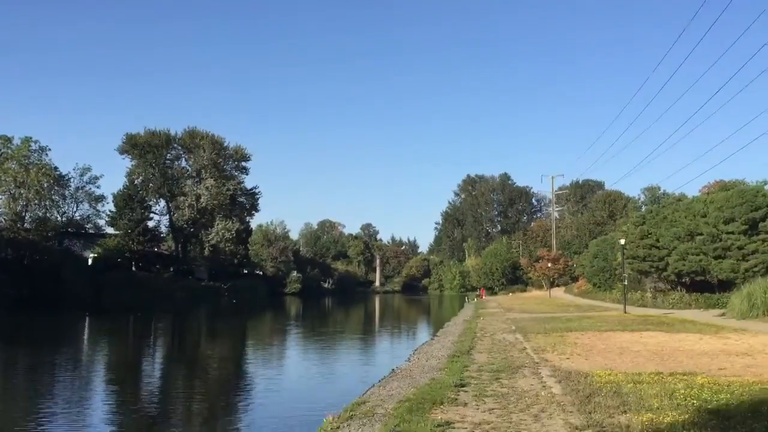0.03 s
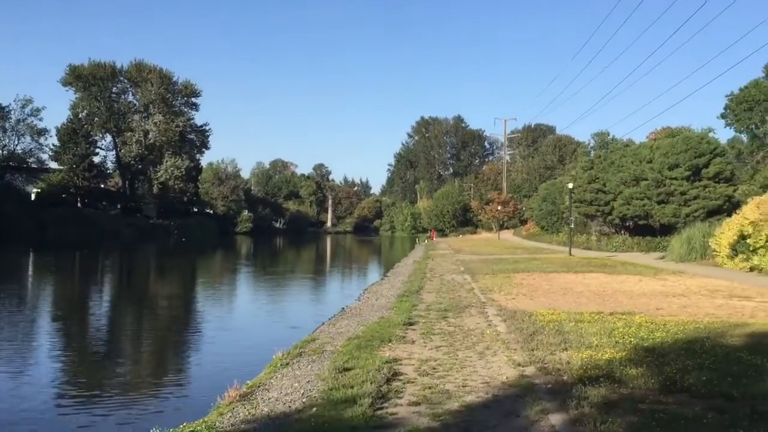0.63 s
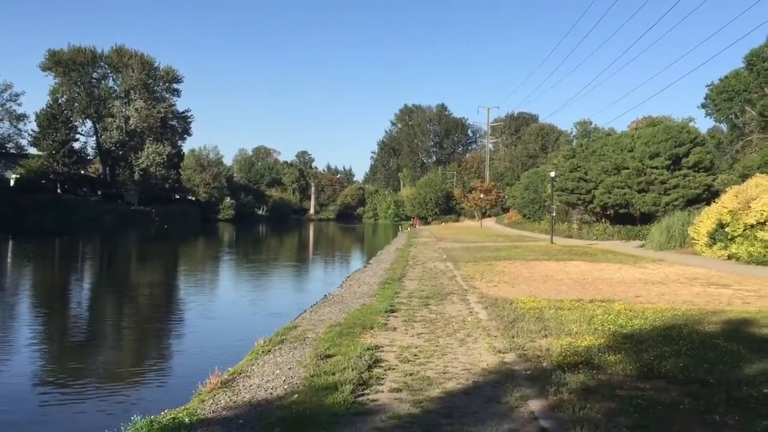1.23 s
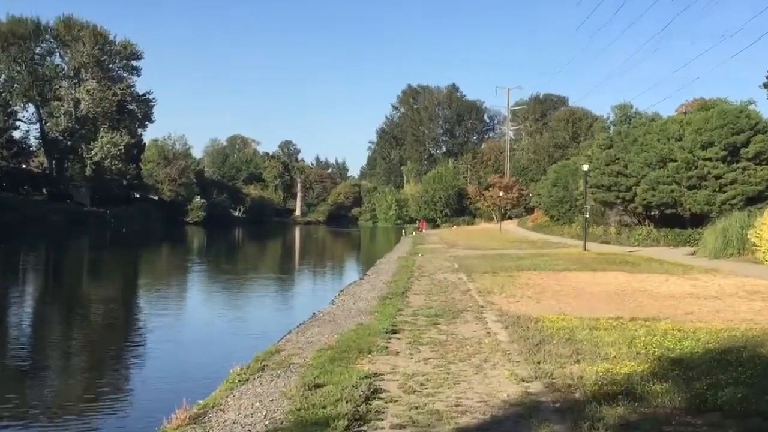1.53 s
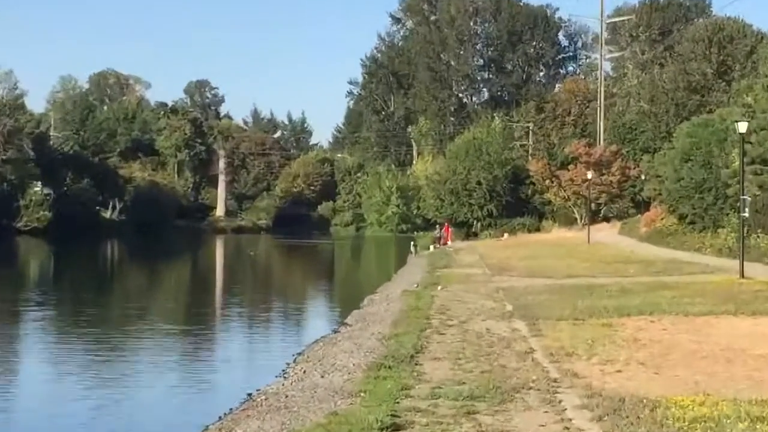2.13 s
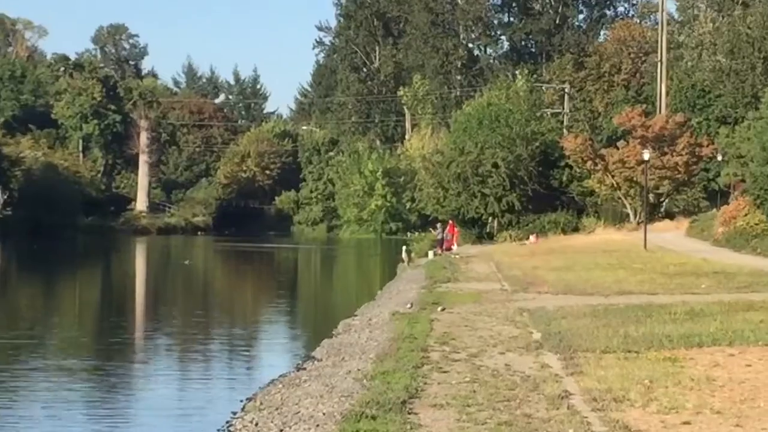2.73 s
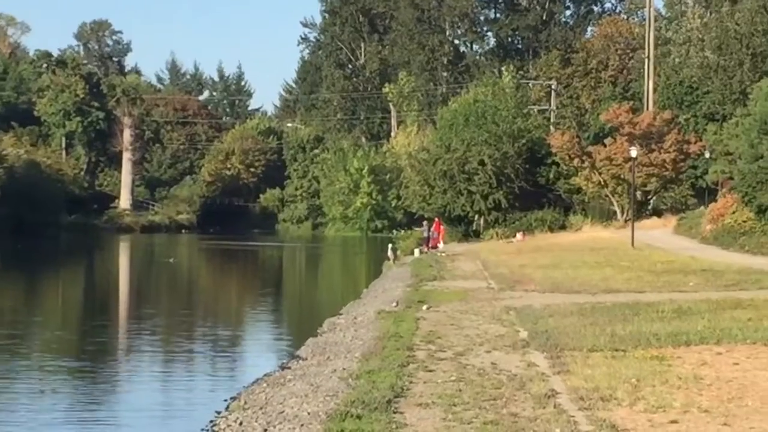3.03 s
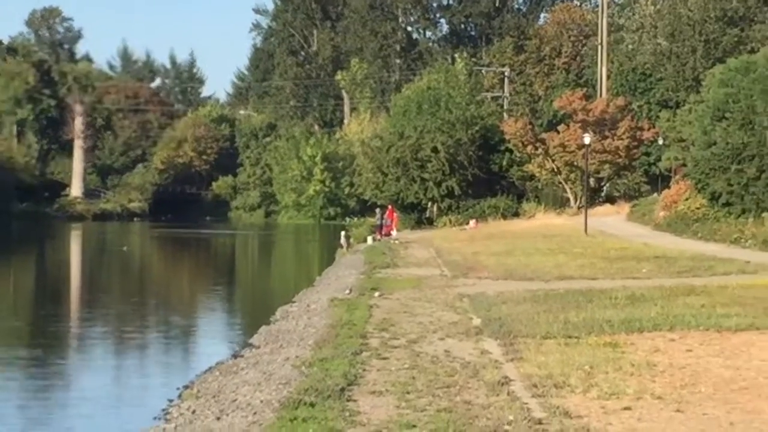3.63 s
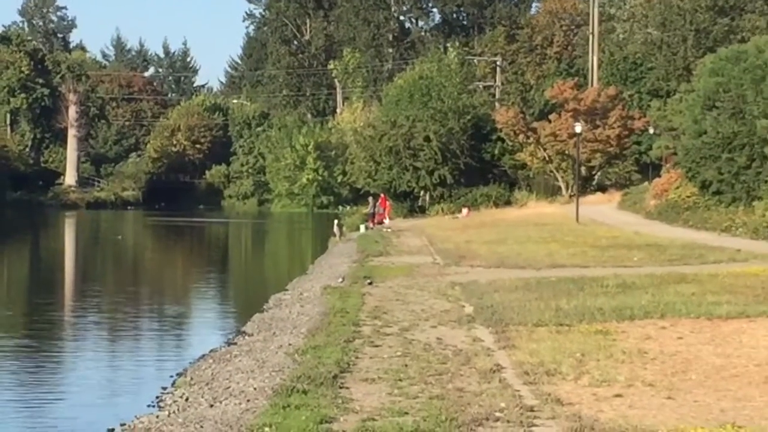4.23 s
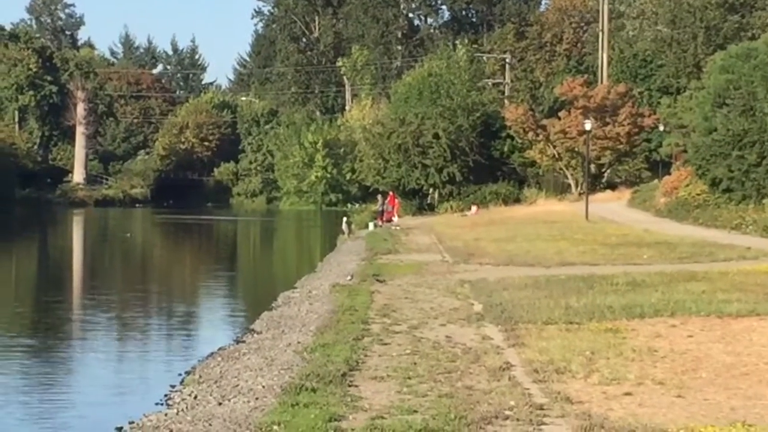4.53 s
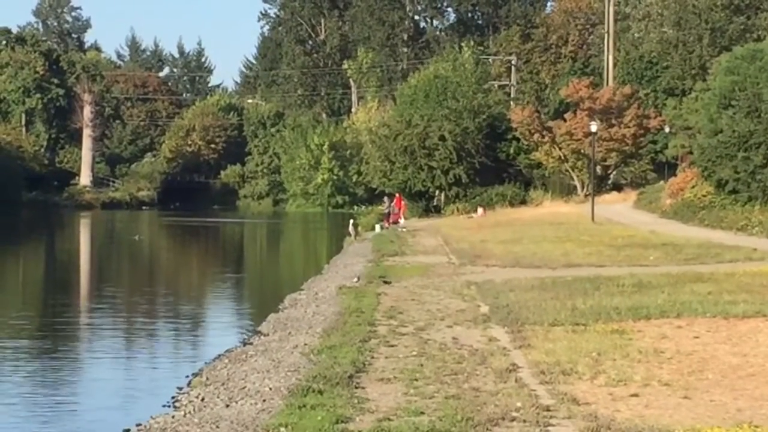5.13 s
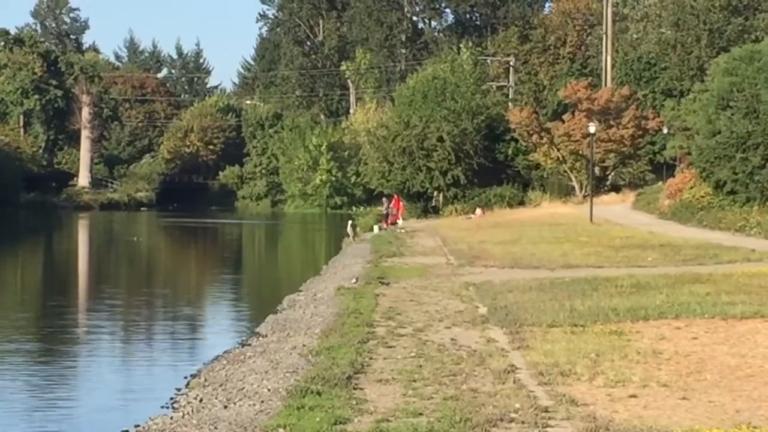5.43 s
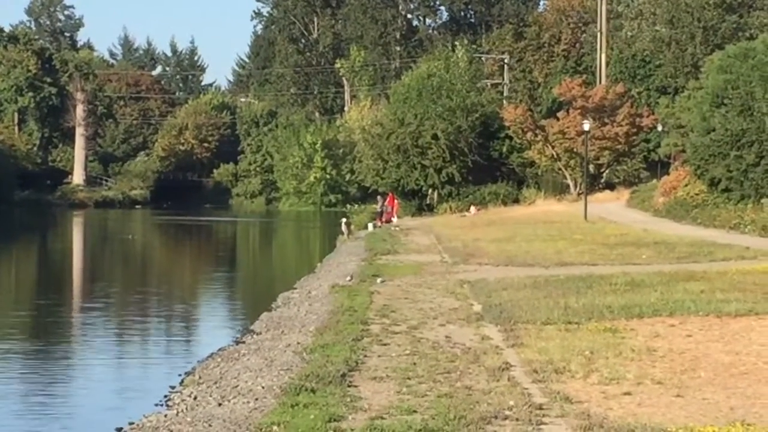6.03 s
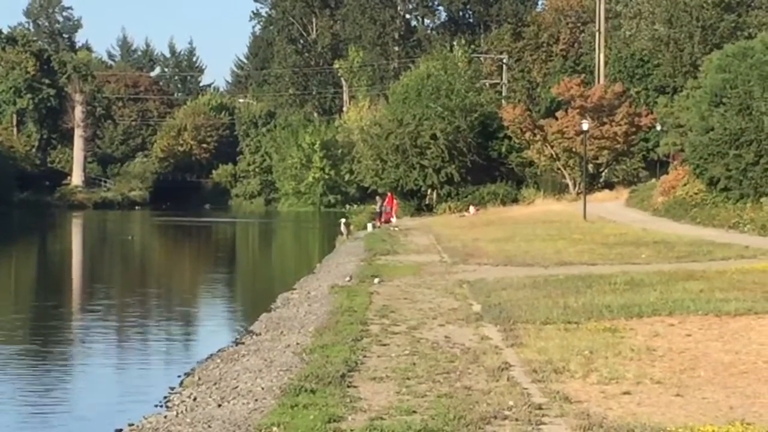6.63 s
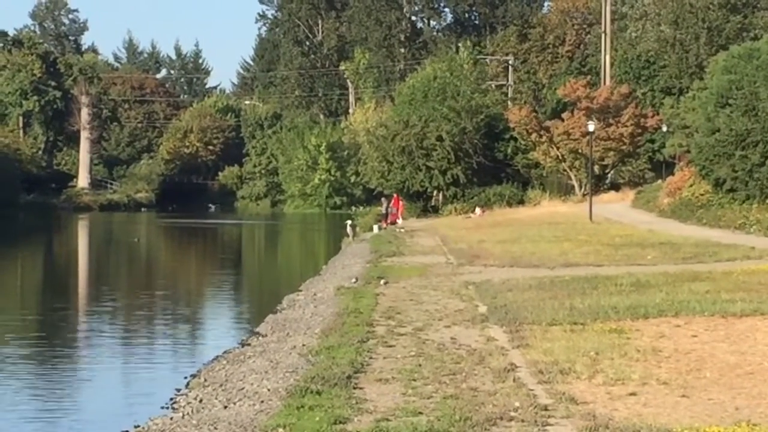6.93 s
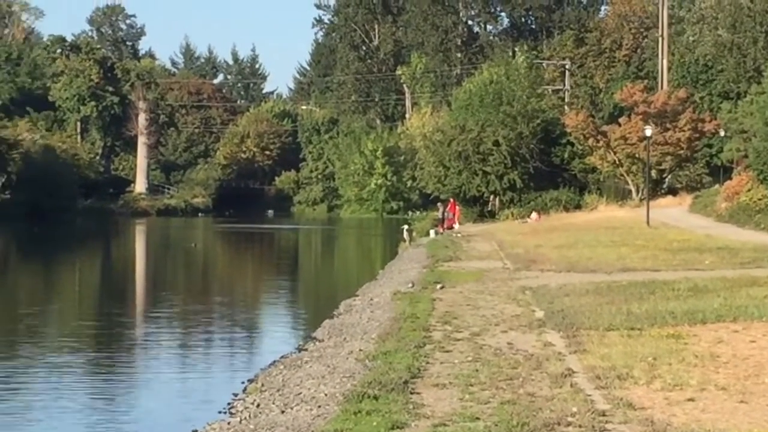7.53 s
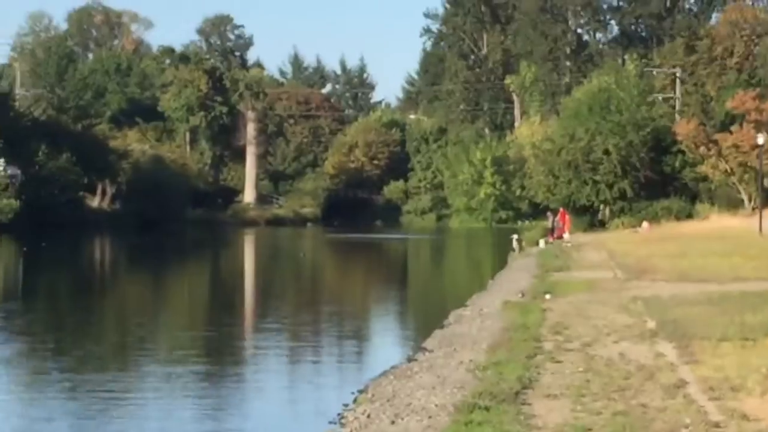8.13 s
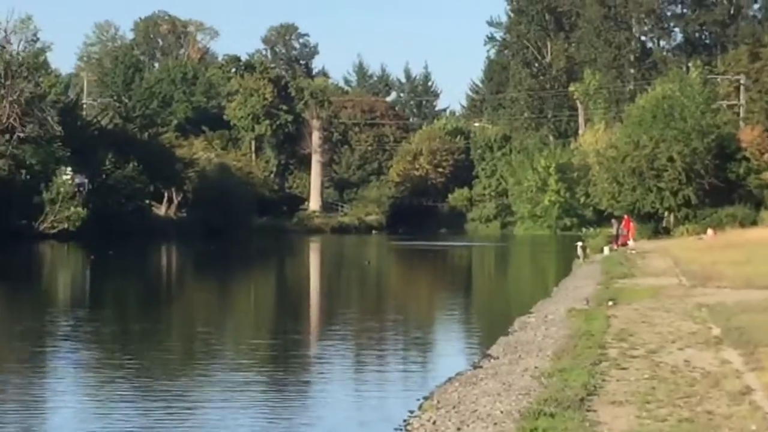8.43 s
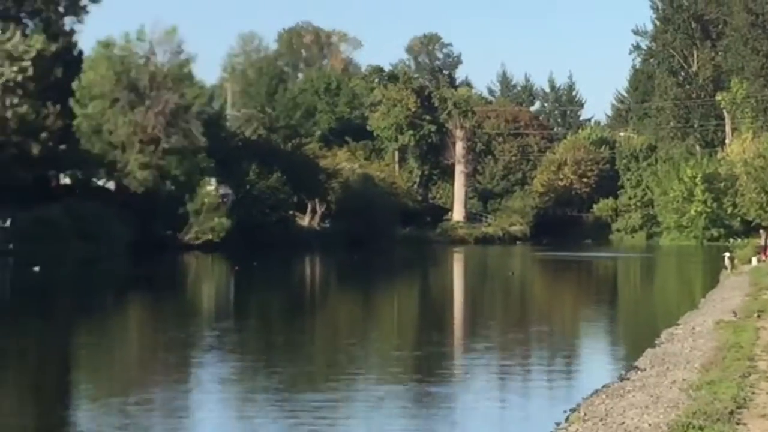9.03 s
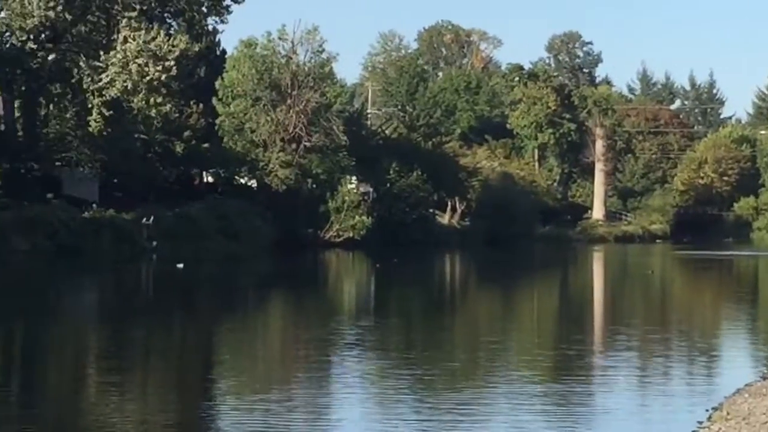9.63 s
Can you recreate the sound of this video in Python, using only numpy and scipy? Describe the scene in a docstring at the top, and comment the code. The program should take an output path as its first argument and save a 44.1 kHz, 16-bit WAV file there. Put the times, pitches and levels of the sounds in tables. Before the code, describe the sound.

Beside a calm river in a park, far road traffic rumbles, swelling and sinking as cars pass. Two engines drone at the start and fade. A distant gull then gives a loose series of short, hoarse yelps, thins out, and calls twice more near the end. Its calls echo lightly off the banks, quieter than the traffic. A faint flock and a soft hiss lie behind, all far from the microphone.

```python
"""A gull yelps and squawks in loose series across a calm river in a park, over a faint flock.
Each call is a stack of harmonics that climbs, sags and turns hoarse. The water smears the calls and
the trees on the banks throw them back. Short tones add one yelp's echo, a faint hoot and thin chirps.
Road traffic rumbles far off: the noise of cars swells and sinks as they pass,
and two engines drone at first. A faint, even hiss lies under everything."""
import sys
import numpy as np
from scipy import signal
from scipy.fft import rfft, irfft, next_fast_len
from scipy.io import wavfile

SR = 44100
rng = np.random.default_rng(int(sys.argv[2]) if len(sys.argv) > 2 else 0)


def materialize(psi):
    """Save the field psi as 16-bit PCM at rate SR to the path in sys.argv[1].

    A 1-D psi becomes a single channel; in a 2-D psi each row is a channel.
    """
    bounded = np.clip(np.atleast_2d(psi).T, -1, 1)
    quanta = np.round(bounded * 32767).astype(np.int16)
    wavfile.write(sys.argv[1], SR, quanta)


N = 430857
T = np.arange(N) / SR

# The tone colours of the noises. Each row: frequency in Hz, relative level in dB.
HISS_COLOUR = [(1000, 5.5), (3000, 2), (4300, 4), (4900, 0.5), (5500, 3), (7000, 1.5), (7700, -0.5),
               (9500, 0.5), (10400, -4.5), (11500, -1.5), (15000, -4.5)]
RUMBLE_COLOUR = [(12, -40), (28, -30), (40, -13.5), (60, -6), (85, 2), (125, -3.5), (195, -6), (270, -10),
                 (330, -14), (420, -25), (700, -57), (3000, -100)]
BOOM_COLOUR = [(60, -40), (125, -18), (160, 5), (200, 0.5), (330, -10), (450, -44), (1500, -90)]
SLOW_TYRE_COLOUR = [(60, -52), (250, -9.5), (420, -8.5), (600, -1), (850, -0.5), (1100, -7), (1400, -19),
                    (1800, -23), (2500, -29.5), (4000, -43), (12000, -80.5)]
MEDIUM_TYRE_COLOUR = [(200, -51), (600, -20), (820, -2.5), (1000, 2.5), (1150, -3.5), (1430, -17),
                      (1700, -16.5), (2100, -25), (2700, -38), (4000, -43.5), (12000, -76)]
FAST_TYRE_COLOUR = [(300, -62), (900, -2), (1250, 4), (1550, -5), (1900, -16.5), (2600, -29), (4000, -42.5),
                    (12000, -86.5)]
EXHAUST_COLOUR = [(100, -31), (250, -4.5), (480, 1), (650, -10.5), (1500, -26), (8000, -85)]
# Cars passing gaps in the trees. Each row: loudest moment, rise time and fall time in seconds,
# tyre level in dB, speed from 0 to 1, rumble level in dB.
PASSING_CARS = [(.1, .3, 0.24, -49.5, 0.51, -53), (.7, 0.29, 0.51, -51, 0.56, -44),
                (1.7, 0.3, 0.27, -58.5, 0.6, -55), (2.6, 0.34, 0.81, -55.5, 0.23, -53.5),
                (4.3, 0.5, 0.33, -53.5, 0.55, -50), (4.85, 0.26, 0.37, -53.5, 0.75, -62),
                (5.85, 0.77, 0.24, -53.5, 0.23, -51), (6.25, .14, 0.14, -50.5, 0.4, -53),
                (9.05, 0.19, 0.81, -50.5, 0.6, -60)]
# The tones of the two engines. Each row: multiple of the engine's base rate, relative level in dB.
LORRY_HARMONICS = [(4, -6), (5, -2), (8, -16.5), (10, -7)]
NEAR_ENGINE_HARMONICS = [(1, 1), (2, -17), (4, -27.5)]
# A short echo of the gull's second yelp, then a faint hoot and a few thin chirps. Each row: loudest
# moment in seconds, pitch in Hz, level in dB, half the length in seconds, warble as a share of the pitch.
SHORT_TONES = [(2.026, 2000, -63, .016, .008), (2.345, 2000, -55.5, .017, 0.012),
               (6.41, 2800, -76, .022, 0.06), (7.22, 2250, -75, 0.043, .069), (8.08, 3040, -76, .025, .04),
               (8.132, 2900, -73, .022, 0.037)]
# Echoes from the banks. Each row: delay in seconds, level in dB.
BANK_ECHOES = [(.048, -25), (.14, -13)]
# How the gull's throat colours its voice, heard from afar. Each row: frequency in Hz, gain in dB.
THROAT_COLOUR = [(1300, 1), (1650, 2), (1950, -8), (2200, -7.5), (2420, -14), (2650, -23), (2950, -29),
                 (3330, -20), (3800, -23.5), (4200, -34), (4500, -23), (4900, -33.5), (6500, -29),
                 (8500, -46)]
# The gull's calls. Each row: start and length in seconds, top pitch in Hz, level in dB, rasp from 0 to 1,
# tilt in dB per octave away from the third harmonic, ring of the open beak in dB,
# sag as a share of the top pitch, level change toward the end in dB.
GULL_CALLS = [(1.531, 0.11, 671, -58.5, 0.44, -2, 1, .27, -0.5),
              (1.84, .115, 670.5, -56, 0.4, -4, 9, .29, -1.5),
              (3.059, .16, 641, -55, 0.25, -6, 2, 0.19, -5),
              (3.494, 0.17, 651, -54, 0.34, -4, 5, .18, -4.5),
              (4.061, 0.15, 629, -58.5, 0.38, -4, -9, 0.15, -3),
              (4.569, 0.15, 624, -58.5, 0.25, -17, -1, .16, -1),
              (5.129, 0.17, 622, -59, 0.23, -14, -5, 0.16, -2.5),
              (6.012, .13, 636, -71, .3, -13, -2, .15, -12),
              (7.917, .13, 601, -68.5, 0.6, -10, -2, .15, -5),
              (9.0, .155, 645, -56, 0.35, -5, 2, .17, -2.5),
              (9.423, .17, 649, -52.5, 0.47, -5.5, -1, 0.21, -4)]


def from_db(db):
    """Turn decibels into a gain."""
    return 10 ** (np.asarray(db) / 20)


def rms_one(x):
    """Scale a signal so that its average strength (rms) is 1."""
    return x / np.sqrt(np.mean(x ** 2) + 1e-20)


def gain_at(colour, hz):
    """Look up the gain of a tone colour at a frequency."""
    points, db = np.transpose(colour)
    return from_db(np.interp(np.log(np.maximum(hz, 1)), np.log(points), db))


def drift(rate_hz, size=N):
    """A smooth random wobble, about 1 in size; a higher rate makes it quicker."""
    pole = np.exp(-40 * np.pi * rate_hz / SR)
    steps = rng.standard_normal(size // 20 + 3002)   # one for every 20 samples, plus a run-up
    slow = signal.lfilter([1], [1, -2 * pole, pole * pole], steps)[3000:]
    return np.interp(np.arange(size) / 20, np.arange(len(slow)), rms_one(slow))


def noise(colour, size=N):
    """Noise with the given tone colour and a strength of 1."""
    padded = next_fast_len(size)
    hz = np.arange(padded // 2 + 1) * SR / padded
    spectrum = rfft(rng.standard_normal(padded)) * gain_at(colour, hz)
    return rms_one(irfft(spectrum, padded)[:size])


def swell(at_s, rise_s, fall_s):
    """The gain of something that comes into earshot and leaves again; 1 at its loudest."""
    width_s = np.where(T < at_s, rise_s, fall_s)
    return np.exp(-.5 * np.minimum(((T - at_s) / width_s) ** 2, 100))


def traffic(rumble_db=-46.5, tyres_db=(-54, -56, -65)):
    """Far vehicles blur into rumble and tyre roar, with one low boom. Faster tyres sing higher."""
    rumble_power = from_db(rumble_db) ** 2   # the steady stream behind the passing cars
    tyre_power = from_db(tyres_db)[:, None] ** 2   # slow, medium and fast tyres
    for at_s, rise_s, fall_s, tyre_db, speed, car_rumble_db in PASSING_CARS:
        nearness = swell(at_s, rise_s, fall_s)
        speed_shares = np.maximum(1 - np.abs(2 * np.clip(speed, 0, 1) - np.arange(3)), 0)
        tyre_power = tyre_power + speed_shares[:, None] * (from_db(tyre_db) * nearness) ** 2
        rumble_power = rumble_power + (from_db(car_rumble_db) * nearness) ** 2
    rumble = np.sqrt(rumble_power) * from_db(1.35 * drift(12.3)) * noise(RUMBLE_COLOUR)
    slow, medium, fast = np.sqrt(tyre_power)
    tyres = slow * from_db(1.6 * drift(10.4)) * noise(SLOW_TYRE_COLOUR)
    tyres += medium * from_db(1.17 * drift(6.8)) * noise(MEDIUM_TYRE_COLOUR)
    tyres += fast * noise(FAST_TYRE_COLOUR)
    boom = from_db(-49.5) * swell(at_s=3.73, rise_s=.12, fall_s=.21) * noise(BOOM_COLOUR)
    return rumble + tyres + boom


def drone(base_hz, harmonics, waver_db):
    """The tones of an engine; each fades in and out on its long way through the air."""
    phase = 2 * np.pi * np.cumsum(base_hz) / SR
    out = np.zeros(N)
    for multiple, db in harmonics:
        gain = np.sqrt(2) * from_db(db + waver_db * drift(6.1))
        out += gain * np.sin(round(multiple) * phase + rng.uniform(0, 2 * np.pi))
    return out


def lorry(at_s=1.9, cycle_hz=20.89, rev_hz_per_s=.3004, unsteady=.0064):
    """A heavy engine drones by farther off, slowly gathering speed and running a little unevenly."""
    hz = (cycle_hz + rev_hz_per_s * (T - at_s)) * (1 + unsteady * drift(8))
    gain = from_db(-45.5) * swell(at_s, rise_s=.57, fall_s=.45)
    return gain * drone(hz, LORRY_HARMONICS, waver_db=3.5)


def near_engine(ease_off_s=.97, top_hz=119.1, rev_hz_per_s=6, coast_hz_per_s=5.2):
    """A vehicle pulls away: its note climbs until the driver eases off, then it sinks and fades."""
    since_s = T - ease_off_s
    firing_hz = top_hz - np.abs(since_s) * np.where(since_s < 0, rev_hz_per_s, coast_hz_per_s)
    hum = drone(firing_hz, NEAR_ENGINE_HARMONICS, waver_db=2)
    hum_gain = from_db(-40) * swell(ease_off_s, rise_s=.78, fall_s=.22)
    # While it pulls hardest, gas rushes out and the exhaust pipe rings at the third harmonic.
    pipe = drone(firing_hz, [(3, 0)], waver_db=1.5) + from_db(-5.5) * noise(EXHAUST_COLOUR)
    pipe_gain = from_db(-47) * swell(at_s=.81, rise_s=.33, fall_s=.191)
    return hum_gain * hum + pipe_gain * pipe


def echo_hoot_and_chirps():
    """One yelp's echo, a faint hoot and thin chirps: each is a short tone, nearly steady or warbled."""
    out = np.zeros(N)
    for at_s, hz, db, half_length_s, warble in SHORT_TONES:
        envelope = np.exp(-np.minimum(((T - at_s) / half_length_s) ** 2, 20))
        phase = 2 * np.pi * np.cumsum(hz * (1 + warble * drift(128))) / SR
        out += from_db(db) * envelope * np.sin(phase)
    return out


def river_banks(calls, water_db=-6, water_s=.015, scatter_db=-5.5, die_away_s=.48, echo_cutoff_hz=2400):
    """The rippled water smears each call; banks and trees send back later, duller echoes."""
    t = T[:SR]
    water = rng.standard_normal(SR) * np.exp(-t / water_s)
    echoes = rng.standard_normal(SR) * from_db(-60 * t / die_away_s) * (1 - np.exp(-t / .02))
    echoes *= from_db(scatter_db) / np.linalg.norm(echoes)
    for delay_s, db in BANK_ECHOES:
        echoes[int(delay_s * SR)] += from_db(db)
    air_loss = signal.butter(2, echo_cutoff_hz, fs=SR, output="sos")   # the echoes lose their treble on their long way through the air
    response = signal.sosfilt(air_loss, echoes) + from_db(water_db) * water / np.linalg.norm(water)
    response[0] += 1   # the sound that arrives directly
    return signal.fftconvolve(calls, response)[:N]


def call_arch(progress, length_s, sag, end_db, top_at=.3, climb=.19, attack_s=.012, release_s=.011):
    """One call's pitch (as a share of its top) and gain: both climb, then sag."""
    before_top = np.maximum(1 - progress / top_at, 0)
    after_top = np.maximum((progress - top_at) / (1 - top_at), 0)
    bend = 1 - climb * before_top ** 2 - sag * after_top ** 1.2
    fade = np.clip(length_s * np.minimum(progress / attack_s, (1 - progress) / release_s), 0, 1)
    follow_db = 9.5 * np.log2(bend)   # higher is louder
    catch_db = -2 * np.exp(-((progress - .52) / .06) ** 2)   # the voice catches just after the top
    return bend, fade * from_db(follow_db + end_db * after_top + catch_db)


def squawk(length_s, top_hz, rasp, tilt_db, ring_db, sag, end_db, beak_hz=3430, beak_width_hz=420):
    """One call. Every other pulse of the voice differs, which adds rough tones between the harmonics."""
    size = int(length_s * SR)
    progress = np.linspace(0, 1, size)
    bend, envelope = call_arch(progress, length_s, sag, end_db)
    broken = np.clip(2.5 * progress - 1, 0, 1)   # the voice breaks up and dulls as it falls
    waver = (.015 + .045 * broken) * rasp * drift(45, size)
    jitter = (.009 + .04 * rasp * broken) * drift(200, size)
    hz = top_hz * bend * (1 + waver + jitter)
    phase = 2 * np.pi * np.cumsum(hz) / SR
    voice = np.zeros(size)
    for multiple in np.arange(4, 25) / 2:   # harmonics 2 to 12 and the tones halfway between
        strength = rasp * (.77 + 1.43 * broken) if multiple % 1 else 1
        octaves_away = np.abs(np.log2(multiple / 3))   # the third harmonic carries the call
        core_db = 4 * (1 - broken / 2) * (multiple == 3)
        slope_db = (tilt_db - 4 * broken) * octaves_away
        beak_db = ring_db * np.exp(-((multiple * hz - beak_hz) / beak_width_hz) ** 2)
        flutter_db = (1.8 + 3 * min(octaves_away, 1)) * drift(50, size)
        gain = gain_at(THROAT_COLOUR, multiple * hz) * from_db(core_db + slope_db + beak_db + flutter_db)
        blur = .28 * max(multiple - 3, 0) * drift(120, size)   # higher tones wobble more
        voice += strength * gain * np.sin(multiple * phase + blur + rng.uniform(0, 2 * np.pi))
    hoarseness = 1 + rasp * (.6 + .4 * broken) * drift(160, size)   # uneven pulses roughen each tone
    breath = rasp * from_db(-3) * noise(THROAT_COLOUR, size)
    return (voice * hoarseness + breath) * envelope


def flock(calls_per_s=2.5, middle_hz=722):
    """A far flock squawks faintly at random moments, each call with its own pitch and strength."""
    out = np.zeros(N + SR)
    for when, pitch, strength in rng.random((int(calls_per_s * N / SR), 3)):
        top_hz = middle_hz * 1.5 ** (pitch - .5)
        call = squawk(length_s=.11, top_hz=top_hz, rasp=.5, tilt_db=0, ring_db=0, sag=.15, end_db=0)
        at = int(when * N)
        out[at:at + len(call)] += from_db(-72.5) * (.5 + strength) * call
    return out[:N]


def gull():
    """One gull yelps and squawks in loose series across the water."""
    out = np.zeros(N + SR)
    for start_s, length_s, top_hz, db, rasp, tilt_db, ring_db, sag, end_db in GULL_CALLS:
        call = squawk(length_s, top_hz, np.clip(rasp, 0, 1), tilt_db, ring_db, sag, end_db)
        at = int(start_s * SR)
        out[at:at + len(call)] += from_db(db) * call
    return out[:N]


def scene():
    """The birds over the traffic and a faint, even hiss, in one channel."""
    birds = river_banks(gull() + flock()) + echo_hoot_and_chirps()
    road = traffic() + near_engine() + lorry()
    hiss = from_db(-76.5) * noise(HISS_COLOUR)
    return (birds + road + hiss)[None]


def record(dry):
    """Fade both ends quickly and cut off the highest treble."""
    fade_s, cutoff_hz = .004, 15250
    fade = np.minimum(np.minimum(T, T[::-1]) / fade_s, 1)
    treble_cut = signal.ellip(10, .1, 70, cutoff_hz, fs=SR, output="sos")
    return signal.sosfilt(treble_cut, dry * fade)


dry = scene()
out = record(dry)
materialize(out)
```